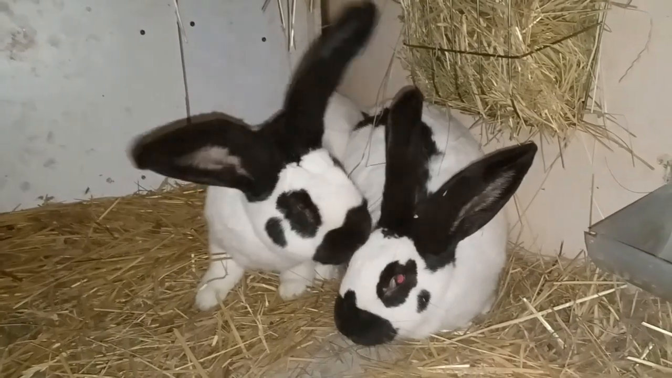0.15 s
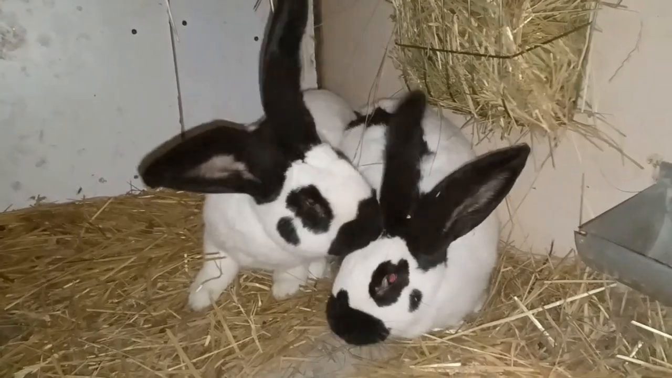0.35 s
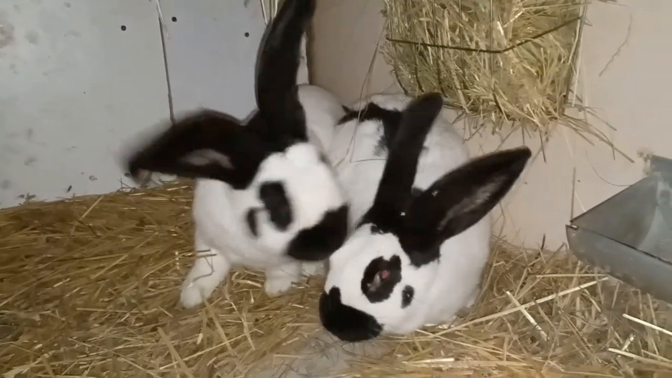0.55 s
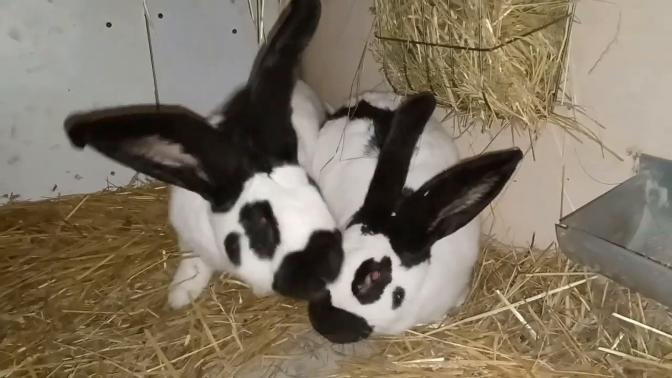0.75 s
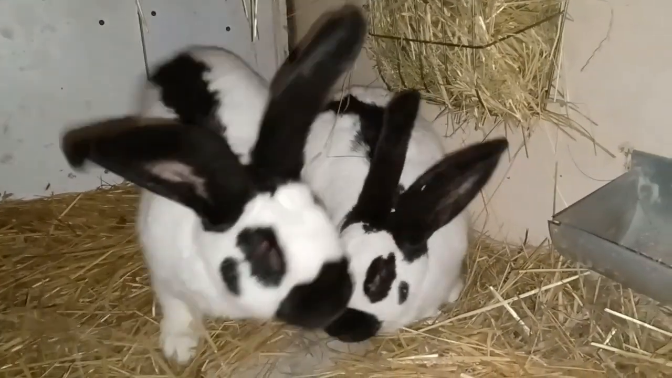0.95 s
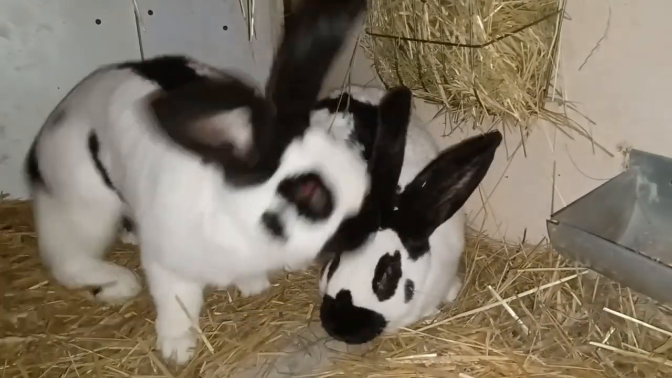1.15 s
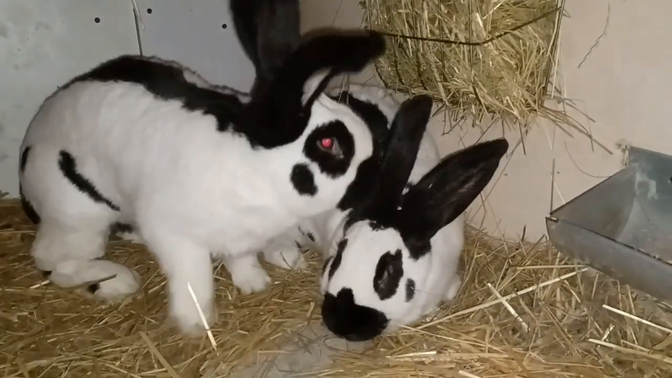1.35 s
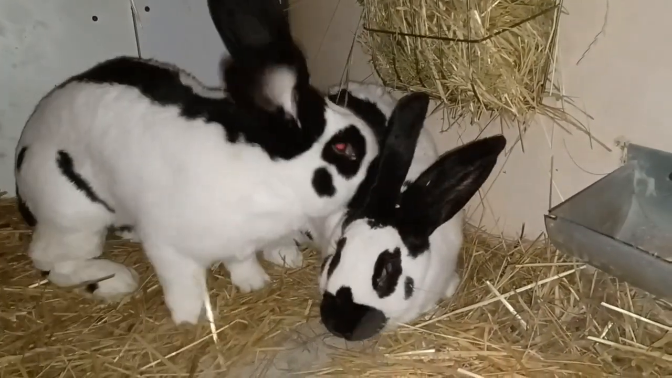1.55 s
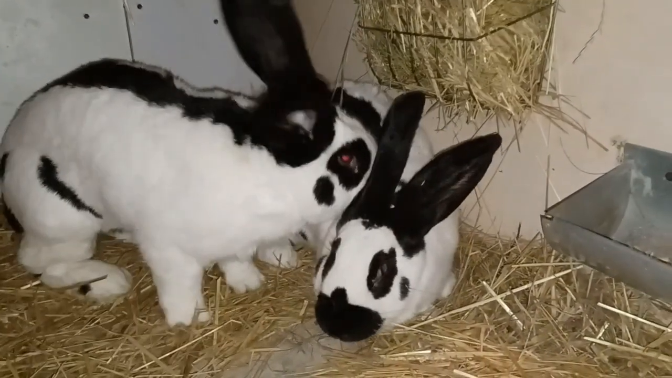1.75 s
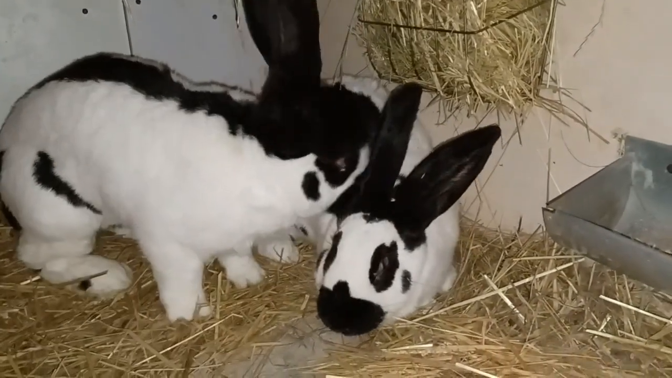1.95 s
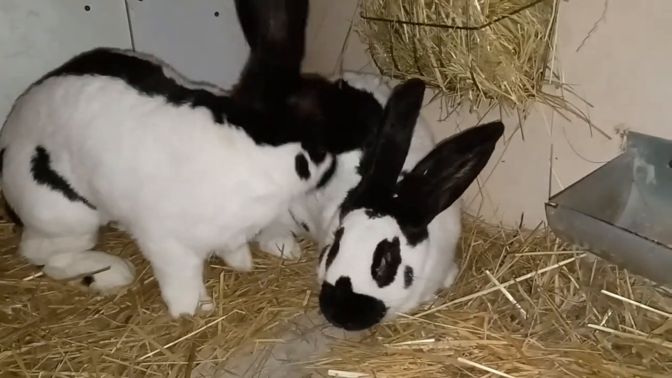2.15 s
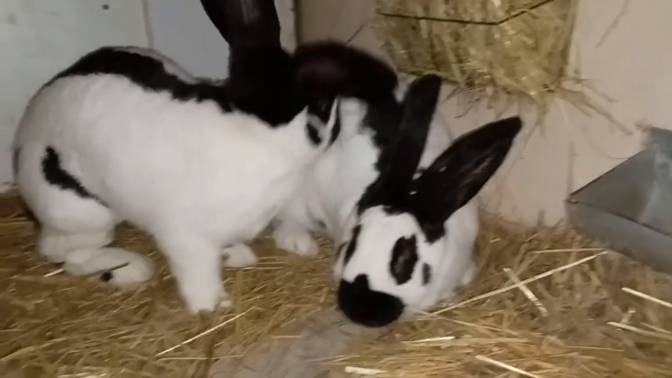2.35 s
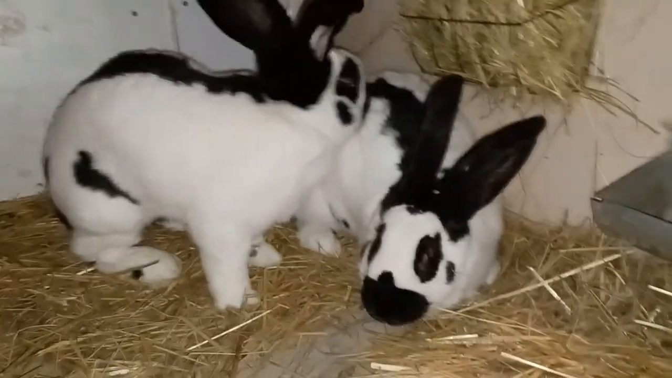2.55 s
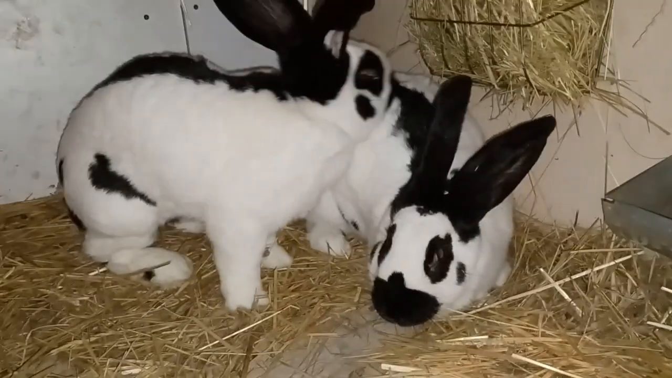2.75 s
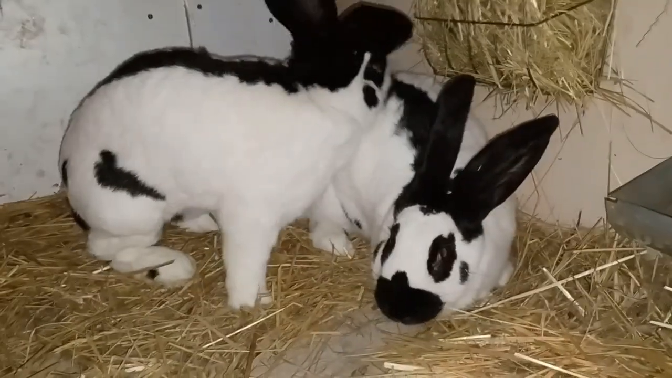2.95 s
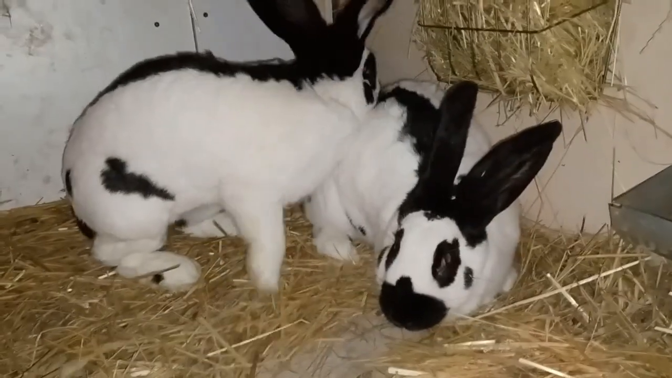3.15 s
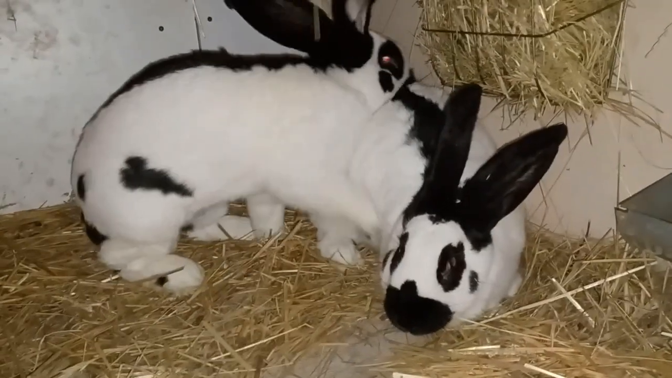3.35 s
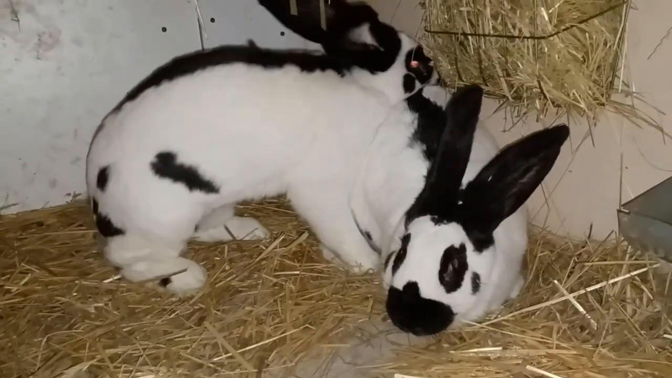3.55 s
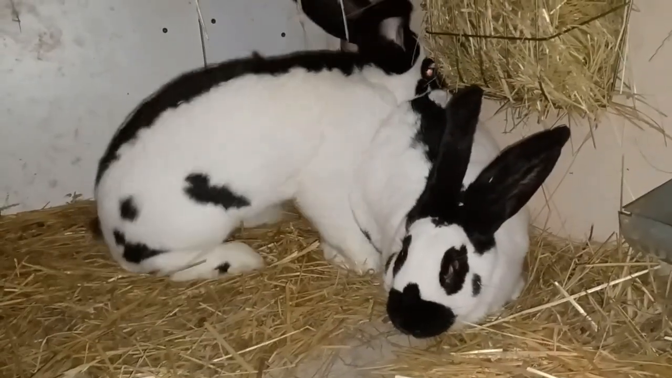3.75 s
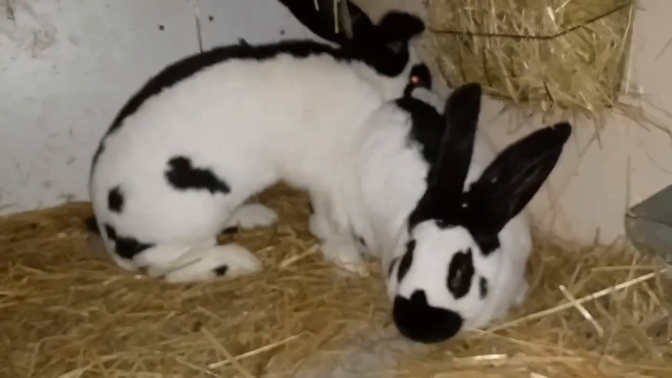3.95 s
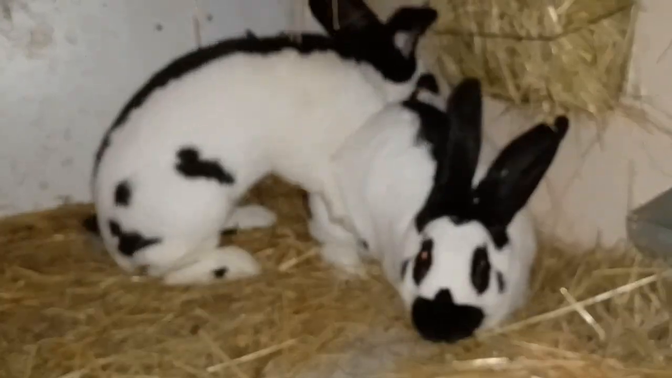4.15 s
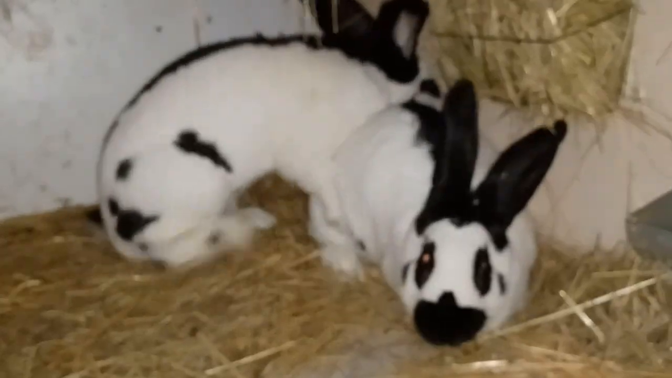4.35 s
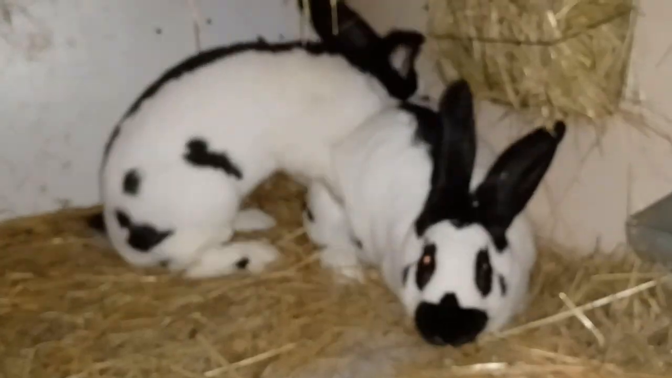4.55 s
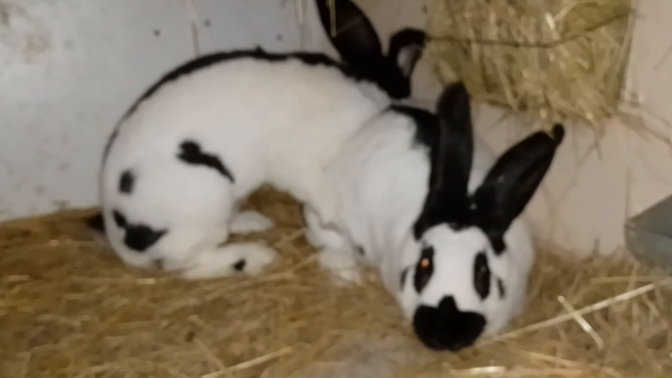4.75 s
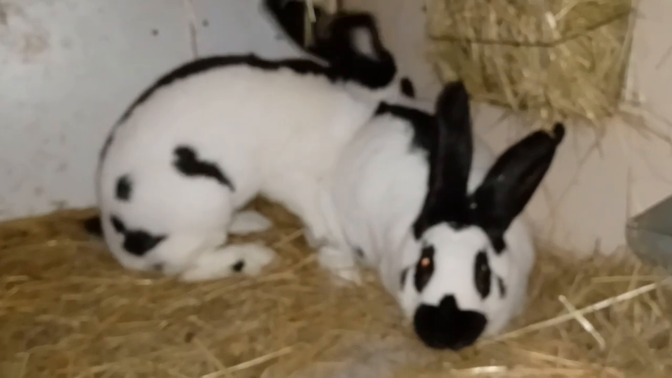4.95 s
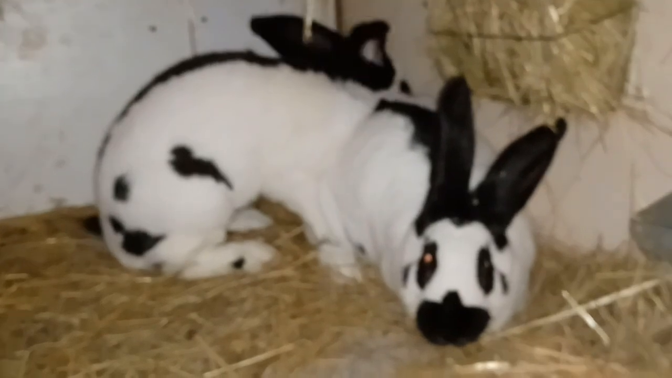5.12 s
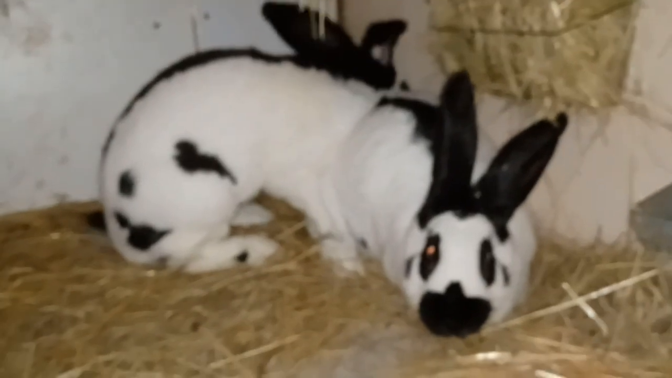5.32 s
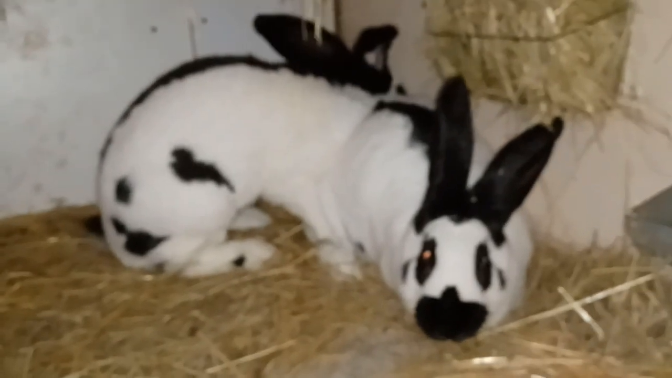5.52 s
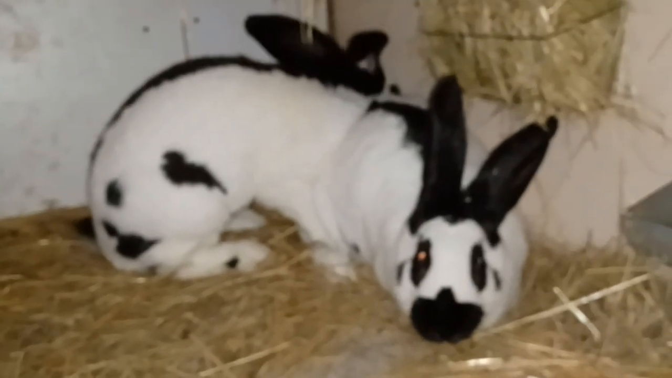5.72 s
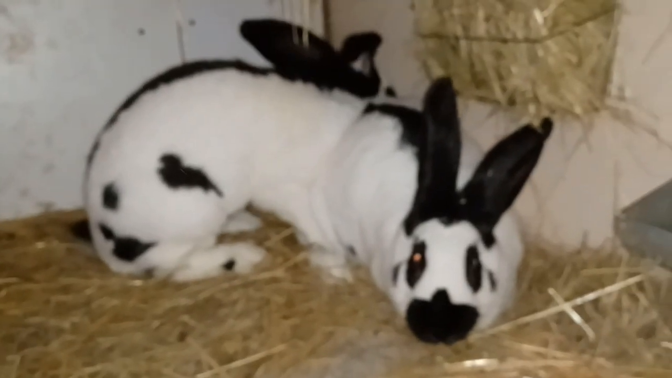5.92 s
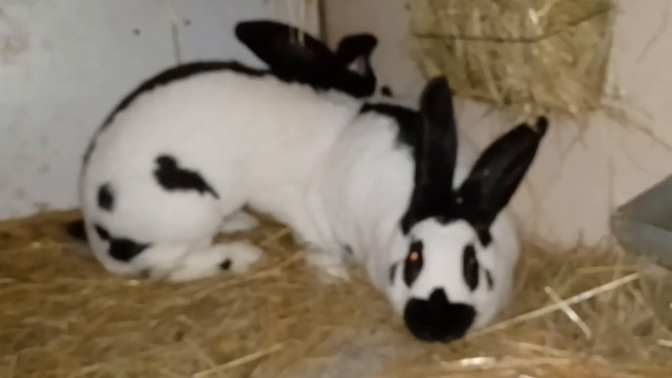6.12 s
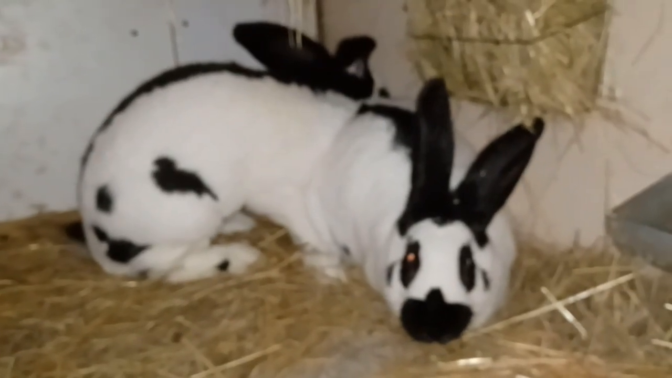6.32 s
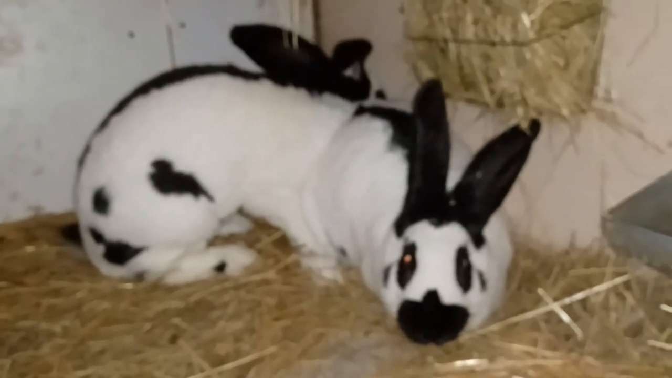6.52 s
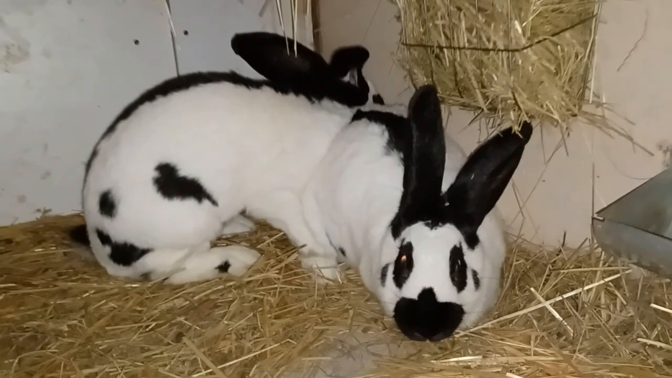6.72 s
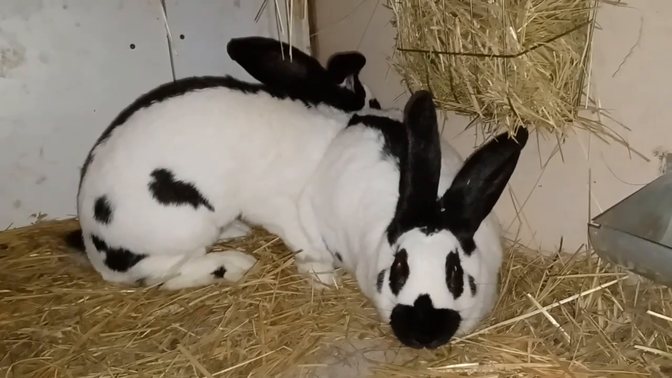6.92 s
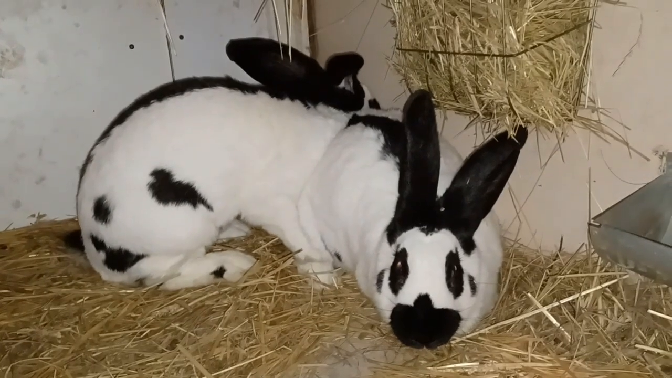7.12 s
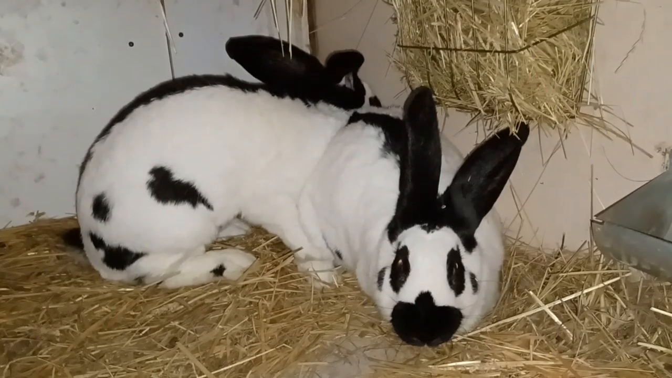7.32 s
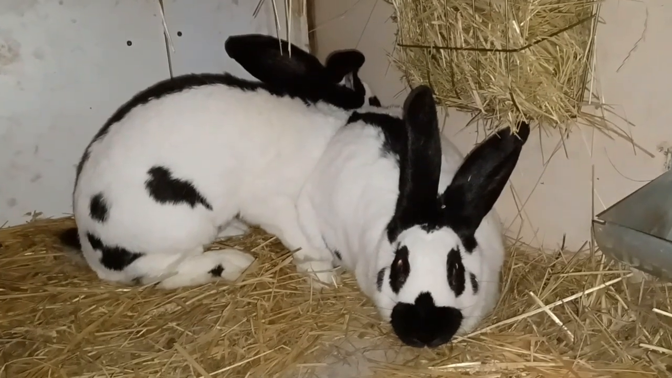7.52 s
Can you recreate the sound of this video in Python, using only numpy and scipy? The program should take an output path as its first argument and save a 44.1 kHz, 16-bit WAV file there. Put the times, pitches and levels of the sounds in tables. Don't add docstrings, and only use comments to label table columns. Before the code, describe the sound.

Rabbits move on deep dry straw, heard very near with hand-held microphones in a small dry enclosure. Quiet at first, then a dull double thump on hollow boards with bright straw crunching, fading into sparse rustles and tiny regular nudges of the bedding. A second thumping rustle follows midway, then a snap, low bumps and creaky dragging. The far drone disappears before the later drags, leaving faint hiss and small crackles.

```python
import sys
import numpy as np
from scipy import signal
from scipy.io import wavfile
from scipy.ndimage import uniform_filter1d

SR = 44100
rng = np.random.default_rng(int(sys.argv[2]) if len(sys.argv) > 2 else 0)


def makeup_ratio(level_db):
    decades = np.asarray(level_db, float) / 20
    return 10 ** decades


def unload_wav(signal):
    wavfile.write(
        sys.argv[1],
        SR,
        np.round(np.clip(np.atleast_2d(signal).T, -1, 1) * 32767).astype(np.int16),
    )


N = 338688
TOP_HZ = 15740

# (time [s], peak [dB], pitch [Hz], t60 [s], rise [s])
PAW_LANDINGS = [(0.8, -37.5, 116, 0.22, 0.005), (0.896, -14.5, 190, 0.059, 0.016),
                (0.9067, -10.5, 109, 0.08, 0.0055), (0.9287, -18.5, 118, 0.094, 0.0054),
                (0.8943, -29, 316, 0.056, 0.0064), (1.124, -25.5, 100, 0.21, 0.0011),
                (1.151, -26.5, 225, 0.11, 0.0029), (3.468, -35.5, 113, 0.25, 0.0042),
                (3.775, -31, 184, 0.023, 0.0015), (3.7842, -16, 94, 0.079, 0.003),
                (1.108, -39, 240, .08, 0.0051), (1.164, -32, 150, .12, 0.0037),
                (3.695, -39.5, 160, 0.092, .004), (3.829, -35, 180, 0.11, .004),
                (0.721, -51.5, 376, 0.071, 0.0026), (3.66, -44.5, 277, 0.12, .005),
                (4.426, -39.5, 241, 0.13, 0.0069), (5.401, -22.5, 88, 0.074, 0.0029),
                (5.431, -26, 75.5, 0.1, 0.004), (5.455, -28.5, 81, 0.27, 0.0028),
                (7.078, -40, 84, 0.35, 0.0037), (7.066, -46, 120, .1, .005), (5.39, -42, 150, .05, .003),
                (4.56, -50, 230, .15, .005)]


def rms_one(x):
    return x / np.sqrt(np.mean(x ** 2) + 1e-20)


def in_time(rows):
    s, *columns = np.transpose(rows)
    return [np.interp(np.arange(N) / SR, s, c) for c in columns]


def at_hz(points, hz):
    points = np.array(points)
    return np.interp(np.log(hz), np.log(points[:, 0]), points[:, 1])


def drift(rate):
    r = np.exp(-80 * np.pi * rate / SR)
    slow = signal.lfilter([1], [1, -2 * r, r * r], rng.standard_normal(N // 40 + 2002))[2000:]
    return np.interp(np.arange(N) / 40, np.arange(len(slow)), rms_one(slow))


def panned(db):
    return makeup_ratio(np.array([db / 2, -db / 2]))


def noise():
    return rng.standard_normal((2, 2, N))


def coloured(white, spectra, patchy_db, ports=1.0):
    # (frequency [Hz], left-right likeness [-1..1])
    likeness = [(60, 0.87), (180, 0.83), (550, 0.23), (1650, -0.22), (4970, 0.0047), (15000, -0.021)]
    # (frequency [Hz], left-right difference [dB])
    port_tilt = [(60, 12), (110, -5.5), (200, 2.5), (380, -8.5), (700, -2.5), (1290, -5.5), (2380, -16),
                 (4400, -13.5), (8120, 1), (15000, -5.5)]
    spectra = [[p for p in s if p[1] > -60 and p[0] < TOP_HZ] for s in spectra]
    low_hz = min(s[0][0] for s in spectra)
    high_hz = 1.2 * max(s[-1][0] for s in spectra)
    edges = np.geomspace(low_hz, high_hz, int(2.6 * np.log2(high_hz / low_hz)) + 1)
    outs = [0] * len(spectra)
    for k, (low, high) in enumerate(zip(edges, edges[1:])):
        band = signal.butter(2, [low, high], "band", fs=SR, output="sos")
        mid, side = signal.sosfilt(band, white[k % 2])
        hz = np.sqrt(low * high)
        alike = np.clip(at_hz(likeness, hz), -1, 1)
        pair = np.sqrt(1 + alike) * mid + np.sqrt(1 - alike) * side * [[1], [-1]]
        pair = pair * panned(ports * at_hz(port_tilt, hz))[:, None] * makeup_ratio(patchy_db * drift(14.1))
        outs = [out + makeup_ratio(at_hz(s, hz)) * pair for out, s in zip(outs, spectra)]
    return [out / np.sqrt(np.mean(out.mean(axis=0) ** 2)) for out in outs]


def resonate(x, hz, width):
    r = np.exp(-np.pi * width / SR)
    return signal.lfilter(np.array([1, 0, -1]) * (1 - r * r) / 2, [1, -2 * r * np.cos(2 * np.pi * hz / SR), r * r], x)


def swell(at_s, rise_s, t60, hold_s=0):
    t = np.arange(min(int((t60 + hold_s) * SR), N - int(at_s * SR))) / SR
    shape = (1 - np.exp(-(t / max(rise_s, 1e-4)) ** 2)) * makeup_ratio(-60 * np.maximum(t - hold_s, 0) / t60)
    return int(at_s * SR), t, shape / shape.max()


def pushes(rows, fine_part=False):
    power = np.zeros(N)
    for s, db, rise, t60, hold, fineness in rows:
        at, t, shape = swell(s, rise, t60, max(hold, 0))
        part = np.clip(fineness, 0, 1) if fine_part else 1
        power[at:at + len(t)] += (makeup_ratio(db) * shape) ** 2 * part
    return power


def slides(rows):
    build_up_db = 21
    t = np.arange(0, N, 20) / SR
    power = 0
    for s, build, hold, db, t60 in rows:
        growth_db = build_up_db * np.minimum(t - s, 0) / build
        release_db = -60 * np.maximum(t - s - hold, 0) / t60
        power = power + makeup_ratio(db + growth_db + release_db) ** 2
    return np.interp(np.arange(N) / SR, t, power)


def drags():
    # (time [s], level [dB], fineness [0 coarse - 1 thin], creak of packed straw [dB])
    drag_curves = [
        [(5.34, -75, 0.2, -98), (5.40, -59, 0.1, -68), (5.47, -48, 0.02, -65.5), (5.60, -46.5, 0.3, -57.5),
         (5.69, -45.5, 0.46, -51), (5.745, -51.5, 0.15, -64.5), (5.775, -61.5, 0.45, -69),
         (5.98, -68.5, 0.5, -100), (6.15, -85, 0.2, -97)],
        [(6.42, -72.5, 0.84, -81), (6.6, -58, 0.56, -81), (6.66, -50, 0.48, -70.5), (6.79, -49.5, 0.3, -70.5),
         (6.84, -53.5, 0.4, -68), (7.0, -50, 0.25, -60), (7.18, -54.5, 0.4, -60.5), (7.197, -59.5, 0.56, -73),
         (7.32, -75, 0.5, -88)],
    ]
    rows = []
    for part in drag_curves:
        before = (part[0][0] - .01, -120, .5, -120)
        after = (part[-1][0] + .01, -120, .5, -120)
        rows += [before, *part, after]
    return in_time(rows)


def still_air():
    # (frequency [Hz], density [dB per Hz])
    hiss_spectrum = [(180, -8), (300, -19), (601, -3), (1000, -1), (1980, -10), (2620, -9.5), (3410, -17),
                     (5510, -13), (8050, -14.5), (15600, -17.5)]
    hiss, = coloured(noise(), [hiss_spectrum], patchy_db=2.5, ports=0.18)
    return makeup_ratio(-76) * hiss


def drone():
    # (time [s], level [dB], change of its first strand, at 840 Hz [dB])
    drone_curve = [(0, -56.5, 0), (.6, -56.5, 1.5), (1.2, -55, 0.5), (1.5, -54, -6.5), (1.9, -61, -7),
                   (2.4, -66.5, -3), (3.0, -66, -7), (3.4, -80, -10), (4.6, -70, -1), (5.4, -110, -4)]
    # (pitch [Hz], width [Hz], level [dB])
    strands = [(840, 58, 0), (945, 75, -1), (1040, 120, -10), (720, 130, -10)]
    # (time [s], pitch shift [ratio])
    pitch_slide = [(0, 1.0), (1.1, 1.0), (1.9, 1.055), (7.68, 1.055)]
    level_db, first_strand_db = in_time(drone_curve)
    shift, = in_time(pitch_slide)
    shared, left, right = rng.standard_normal((3, N + N // 8))
    white = 0.8 * shared + np.array([left, right])
    read = np.cumsum(shift)
    out = 0
    for k, (hz, width, db) in enumerate(strands):
        strand = rms_one(resonate(resonate(white, hz, width), hz, width))
        slid = np.array([np.interp(read, np.arange(len(shared)), side) for side in strand])
        out = out + makeup_ratio(db + first_strand_db * (k == 0) + 1.8 * drift(16.0)) * slid
    return makeup_ratio(level_db - 5.0 + 0.43 * drift(11.0)) * out


def hutch(sliding):
    # (time [s], rumble level [dB])
    weight = [(0.0, -58), (0.41, -64.5), (0.77, -54.5), (0.96, -48), (1.05, -46), (1.56, -59),
              (1.88, -62.5), (2.33, -58), (2.74, -63.5), (3.72, -52), (3.98, -60), (5.31, -59.5),
              (5.54, -54.5), (5.7, -54.5), (5.76, -64.5), (5.97, -62.5), (6.63, -69.5), (6.91, -62.5),
              (7.68, -72)]
    # (frequency [Hz], density [dB per Hz])
    rumble_spectrum = [(90, -15), (130, -4), (180, -1), (240, -4), (320, -23), (420, -32), (600, -67.5)]
    depth_spectrum = [(25, -21), (45, -14), (60, 2), (90, -5), (125, 2), (170, -21.5)]
    creak_spectrum = [(300, 17.5), (500, 9), (800, 12), (1200, 4.5), (1800, -14), (2400, -44)]
    depth_db, deepens_db_per_s, settles_from_s = -11.5, 2, 2.76
    shake_db, shake_t60_s = -26.5, 0.31
    creak_rest_db, creak_settles_db_per_s, creak_follows_weight = -69, 3.5, 0.25
    creak_under_slide_db, creak_lag_s = -17, 0.025

    weight_db, = in_time(weight)
    t = np.maximum(np.arange(N) / SR - settles_from_s, 0)
    after_thumps = pushes([(s, db + shake_db, .02, shake_t60_s, 0, 0) for s, db, *_ in PAW_LANDINGS])
    shake = np.sqrt(makeup_ratio(weight_db) ** 2 + after_thumps)

    lag = np.exp(-1 / (creak_lag_s * SR))
    slid_on = signal.lfilter([1 - lag], [1, -lag], sliding)
    rest_db = creak_rest_db - creak_settles_db_per_s * t + creak_follows_weight * (weight_db - weight_db.mean())
    pressed = np.sqrt(makeup_ratio(rest_db) ** 2 + makeup_ratio(drags()[2]) ** 2 + makeup_ratio(creak_under_slide_db) ** 2 * slid_on)

    rumble, depth = coloured(noise(), [rumble_spectrum, depth_spectrum], patchy_db=3.5, ports=0.34)
    creak, = coloured(noise(), [creak_spectrum], patchy_db=3.5, ports=0.6)
    deepening = makeup_ratio(depth_db + deepens_db_per_s * t + 2 * drift(6.0))
    return shake * (rumble + deepening * depth) + pressed * creak


def thumps():
    # (time [s], peak [dB], pitch [Hz])
    weight_shifts = [(.03, -73, 108), (0.119, -52, 82), (0.52, -48, 84), (6.599, -53.5, 77),
                     (.415, -46, 103), (0.678, -50.5, 187), (1.79, -49, 207.5), (1.799, -48.5, 87),
                     (2.339, -54, 287), (3.076, -50.5, 265), (3.089, -46, 97), (3.339, -42, 80.5),
                     (3.668, -37.5, 82), (3.83, -32.5, 73), (4.842, -42.5, 87), (5.039, -48, 75),
                     (5.262, -41, 69.6), (5.642, -55, 312), (5.639, -38.5, 68), (5.88, -51, 74.5),
                     (6.147, -45, 90.5), (6.856, -44.5, 81), (7.301, -74, 69.5)]
    shift_t60_s, shift_rise_s = 0.25, 0.0028
    out = np.zeros(N)
    for s, peak_db, hz, t60, rise in PAW_LANDINGS + [(*row, shift_t60_s, shift_rise_s) for row in weight_shifts]:
        at, t, shape = swell(s, rise, t60)
        turns = hz * (0.908 * t + 0.0022 * (1 - np.exp(-t / 0.057)))
        swing = np.sin(2 * np.pi * turns)
        swing = swing + 0.089 * np.sin(2 * np.pi * 1.874 * turns)
        damping = np.exp(-(t / (0.37 * t60)) ** 4)
        out[at:at + len(t)] += makeup_ratio(peak_db) * shape * damping * swing
    thinned = signal.sosfiltfilt(signal.butter(2, 62, "high", fs=SR, output="sos"), out)
    return thinned * panned(1.7)[:, None]


def squeaks():
    # (start [s], end [s], first pitch [Hz], last pitch [Hz], level [dB])
    squeak_list = [
        (1.722, 1.745, 3000, 3000, -74),
        (5.338, 5.379, 1700, 1700, -69.5),
    ]
    out, waver = np.zeros(N), makeup_ratio(3.5 * drift(90))
    for start, end, first_hz, last_hz, db in squeak_list:
        a, b = int(start * SR), int(end * SR)
        tone = np.sin(2 * np.pi * np.cumsum(np.linspace(first_hz, last_hz, b - a)) / SR)
        out[a:b] += makeup_ratio(db) * signal.windows.tukey(b - a, .5) * tone
    return waver * out * panned(-18.0)[:, None]


def rubs():
    # (start [s], end [s], pitch [Hz], width [Hz], level [dB])
    rub_list = [(0.09, .15, 5540, 1200, -78), (0.587, 0.645, 5500, 203, -83),
                (1.99, 2.17, 2600, 450, -74.5), (2.42, 2.66, 2630, 700, -81.5),
                (2.797, 2.877, 2640, 200, -74.5), (3.083, 3.095, 2840, 200, -62),
                (3.2, 3.23, 2200, 900, -67), (4.034, 4.377, 2440, 900, -75.5),
                (3.937, 4.85, 1330, 1300, -73), (5.345, 5.382, 2800, 200, -78),
                (3.3, 3.347, 2900, 500, -75), (5.84, 6.096, 2450, 800, -74), (5.998, 6.035, 2570, 400, -78),
                (2.92, 3.043, 974, 120, -72), (6.63, 6.74, 3000, 300, -64), (6.75, 6.95, 2500, 300, -68)]
    out, white = np.zeros((2, N)), rng.standard_normal((2, N)) * makeup_ratio(0.72 * drift(42))
    for start, end, hz, width, db in rub_list:
        a, b = int(start * SR), int(end * SR)
        tone = rms_one(resonate(resonate(white[:, a:b], hz, width), hz, width))
        out[:, a:b] += makeup_ratio(db) * signal.windows.tukey(b - a, .85) * tone
    return out * panned(-13.5)[:, None]


def ticks():
    # (time [s], peak [dB], pitch [Hz], t60 [s], overtone level [dB])
    knocks = [(.121, -55, 900, 0.034, -11), (.472, -60, 900, .03, -12), (0.841, -55, 2630, 0.011, -8),
              (0.861, -44, 3370, .012, -6), (.8926, -32, 3580, .015, -9), (.943, -45, 2430, .012, -4),
              (1.0153, -43, 5450, .012, -20), (1.1067, -42, 3600, .012, -6), (1.1445, -36, 3060, 0.013, -6),
              (1.894, -66, 1010, .02, -8), (3.6268, -40.5, 5060, 0.011, -20), (3.6477, -31, 5070, .02, -20),
              (3.672, -38, 2900, 0.014, -3), (3.7805, -38, 2500, 0.014, -5),
              (3.8313, -48, 2700, 0.0097, -3), (3.852, -45.5, 3000, .01, -8),
              (5.4622, -29.5, 1460, 0.0047, 2), (5.594, -39, 2480, 0.013, -12), (5.596, -44, 750, .03, -7),
              (5.639, -38, 410, 0.017, 1), (5.664, -40, 760, .04, -10), (5.7, -47, 483, .03, -6),
              (5.714, -47, 398, 0.029, -6), (6.0548, -60, 2200, .007, -15),
              (6.0644, -49, 2150, 0.0056, -22), (6.674, -42, 3220, 0.0054, -12),
              (6.7534, -31, 2400, 0.0048, -3.5), (6.779, -43, 2950, .015, -8),
              (7.1002, -39, 2140, .02, -12), (7.0994, -41, 4700, .005, -20), (7.1004, -46, 1100, .01, -12),
              (5.4614, -36, 5200, .006, -20), (.899, -32, 3800, .015, -8), (.108, -66, 2650, .06, -20)]
    overtone_ratio, overtone_t60_share, pan_db = 1.85, .6, -7
    out = np.zeros((2, N))
    for s, peak_db, hz, t60, overtone_db in knocks:
        at, t, shape = swell(s, .0003, t60)
        upper = shape ** (1 / overtone_t60_share) * np.sin(2 * np.pi * overtone_ratio * hz * t)
        lead = np.array([[0], [hz / 2500]])
        ring = shape * np.sin(2 * np.pi * hz * t + lead) + makeup_ratio(overtone_db) * upper
        sides = panned(pan_db * min(hz / 2000, 1))[:, None]
        out[:, at:at + len(t)] += makeup_ratio(peak_db) * sides * ring
    return out


def snaps():
    # (time [s], peak [dB], ring [Hz], left-right difference [dB], length [s])
    breaks = [(0.891, -38, 750, 0, .014), (3.022, -57, 6300, 0, .004), (5.4262, -45, 1400, -5, .003),
              (5.461, -29, 2900, -7, .0018), (7.3258, -58, 2600, -13, .002), (3.139, -47, 4500, -5, .003),
              (4.332, -51, 4000, -5, .003), (7.0994, -38, 3300, -8, .0015), (6.6737, -38, 4200, -8, .0015),
              (1.4715, -47, 4500, -4, .003), (1.6685, -55, 4500, -4, .003), (3.4865, -49, 5000, -4, .003),
              (3.4655, -51, 5500, -4, .003), (7.638, -66, 4000, -4, .003), (5.3365, -62, 3000, -8, .003)]
    stem_t60_s, splinter_share, spread = .005, 1.6, 2.7
    extra_pitch, settle_share = 1.7, .3
    heard = signal.butter(5, [450, 6800], "band", fs=SR, output="sos")
    out = np.zeros((2, N))
    for s, peak_db, hz, pan_db, length in breaks:
        at, t, shape = swell(s, 0.00021, stem_t60_s, length)
        settle = settle_share * min(length, .003)
        bent_t = t + extra_pitch * settle * (1 - np.exp(-t / settle))
        wave = np.sin(2 * np.pi * hz * bent_t + rng.uniform(0, 1.5, (2, 1)))
        splinter = (rng.standard_normal(1200) + .6 * rng.standard_normal((2, 1200)))[:, :len(t)]
        band = signal.butter(1, [hz / spread, min(hz * spread, 9000)], "band", fs=SR, output="sos")
        splinter = rms_one(signal.sosfilt(band, splinter))
        snap = panned(pan_db)[:, None] * shape * (wave + splinter_share * splinter)
        snap = signal.sosfilt(heard, snap)
        out[:, at:at + len(t)] += makeup_ratio(peak_db) * snap / np.abs(snap.mean(axis=0)).max()
    return out


def cracks():
    cracks_per_s, ring_cycles = 900, 14
    sizes = makeup_ratio(3.0 * np.minimum(rng.exponential(1, N), 3)) * (rng.random(N) < cracks_per_s / SR)
    dealt, sides = rng.integers(0, 10, N), rng.standard_normal((2, N))
    out = 0
    for k, hz in enumerate(np.geomspace(2600, 7000, 10)):
        clicks = sides * sizes * (dealt == k) + 1e-18
        out = out + resonate(clicks, hz, 2.0 * hz / ring_cycles) / np.sqrt(hz)
    return rms_one(out)


def stem_ticks(per_s, spread_db):
    sizes = makeup_ratio(spread_db * np.minimum(rng.exponential(1, N), 5)) * (rng.random(N) < per_s / SR)
    return noise() * rms_one(uniform_filter1d(sizes, size=6))


def straw(sliding):
    # (time [s], peak [dB], t60 [s], rise [s], fineness [0 coarse - 1 thin])
    gives = [(0.775, -43, 0.12, .001, 1), (0.836, -28.5, 0.17, 0.01, 1), (0.887, -12, 0.061, .005, 0.89),
             (1.018, -27.5, 0.068, 0.0054, 1), (1.072, -35, 0.14, .001, .95),
             (1.144, -17, 0.061, 0.002, 0.82), (1.3, -36, 0.087, 0.0026, 1), (1.394, -44, 0.044, .001, 1),
             (1.555, -46, .02, .001, .7), (1.469, -30, 0.081, .001, 1), (1.481, -29, .03, .001, 0.88),
             (1.668, -36, 0.014, 0.00073, 0.82), (1.681, -40, 0.03, 0.00055, 0.81),
             (2.05, -50, 0.024, .001, .5), (2.082, -47, .03, .002, .5), (2.314, -39.5, 0.08, 0.0027, 0.97),
             (2.36, -42, 0.029, .002, 0.97), (2.5044, -47, 0.064, .002, .8),
             (2.743, -44.5, .024, 0.00097, 0.76), (2.6, -56, .018, 0.00092, 0.77),
             (2.946, -45, .059, .001, .85), (3.0209, -48, 0.035, .0006, 0.94),
             (3.122, -40, .03, .001, 0.89), (3.138, -35, 0.22, .0005, 0.91), (3.246, -41, .03, .001, 0.64),
             (3.264, -34, 0.048, 0.00092, 0.91), (3.464, -34.5, 0.037, .0004, 0.92),
             (3.486, -35.5, .037, .0004, 1), (3.516, -29, .028, 0.00048, 0.96),
             (3.626, -30, 0.045, .002, 1), (3.67, -24, 0.035, .002, 0.81), (3.761, -30, .068, .006, 1),
             (3.775, -28, 0.037, .002, 0.92), (3.8315, -29, 0.079, .002, 0.57),
             (3.85, -30, 0.02, .001, 0.56), (4.3315, -44, 0.023, .0004, 0.62),
             (4.389, -32, 0.15, 0.00089, 0.69), (4.575, -44, 0.04, .002, 0.91),
             (1.108, -24, 0.036, .002, 0.83), (6.929, -38, 0.045, .001, .5)]
    # (time [s], peak [dB], fineness [0 coarse - 1 thin], rise [s])
    flank_nudges = [(0.0857, -55.5, .22, 0.02), (0.5851, -55.5, 0.26, 0.019), (0.705, -51, 1, 0.032),
                    (2.042, -41.5, 0.6, 0.011), (2.2777, -46, 0.86, 0.0083), (2.4703, -46, 0.65, .008),
                    (2.66, -48.5, 0.65, 0.0066), (2.8595, -42, 0.77, .01), (3.068, -39, 0.94, 0.016),
                    (4.123, -46, 0.28, .006), (4.741, -47, 0.35, 0.009), (4.946, -50, 0.36, .008),
                    (5.136, -49.5, 0.51, 0.022), (5.334, -49, 0.32, .005), (5.7994, -52, .98, .01),
                    (6.001, -45.5, 0.13, 0.0089), (6.219, -49, 0.53, 0.016), (6.4218, -52.5, 0.27, .014),
                    (7.239, -52, 0.44, .01), (7.3253, -50, 0.14, .006), (7.434, -49.5, 0.31, 0.014),
                    (7.639, -48, 0.65, .005)]
    # (full at [s], build-up [s], hold [s], level [dB], release t60 [s])
    fur_brushes = [(.845, 0.055, 0.013, -50, 0.076), (.888, 0.0069, 0.0059, -47, 0.017),
                   (1.026, .04, .006, -54, 0.25), (1.073, .004, 0.031, -47, 0.28),
                   (1.146, .004, 0.005, -38, 0.04), (1.41, .03, .04, -62, .1), (3.14, .002, .015, -56, .06),
                   (3.7, .03, .012, -56, .06), (3.756, .003, 0.017, -61, 0.083),
                   (3.842, .004, .004, -52, 0.037), (3.2, 0.092, 0.091, -71, 0.099),
                   (7.05, 0.22, 0.12, -57, .1)]
    # (frequency [Hz], density [dB per Hz])
    fine_spectrum = [(710, -34.5), (1200, -6), (1500, -28), (2050, -28.5), (2680, 1), (3220, -0.5),
                     (5060, 4), (7850, -3), (12700, 4.5), (15600, 7)]
    coarse_spectrum = [(710, -12), (1200, -4), (1660, -0.5), (2520, -2.5), (3260, -9), (6000, -2),
                       (7770, -14), (12200, -9.5), (15600, -16.5)]
    fur_spectrum = [(7000, -24), (9000, -18), (11500, 1), (13500, 7), (15600, 4)]
    give_crest_db, give_hold_share = 16.0, 0.17
    nudge_hold_s, nudge_t60_s, nudge_crest_db, nudge_uneven_db = 0.019, 0.4, 15.5, 1.6
    slide_fineness, slide_pan_db, drag_pan_db, crackle_db, cracks_db = 0.78, 5, 3, -1, -11

    drag_db, drag_fineness, _ = drags()
    puffs = [(s, db - give_crest_db, rise, t60, give_hold_share * t60, f) for s, db, t60, rise, f in gives]
    nudges = [(s - rise, db - nudge_crest_db, rise, nudge_t60_s, nudge_hold_s, f)
              for s, db, f, rise in flank_nudges]
    uneven = makeup_ratio(nudge_uneven_db * drift(22)) ** 2
    drag = makeup_ratio(drag_db) ** 2
    power = sliding + pushes(puffs) + uneven * pushes(nudges) + drag
    fine_power = slide_fineness * sliding + pushes(puffs, True) + uneven * pushes(nudges, True)
    share = np.clip((fine_power + drag_fineness * drag) / power, 0, 1)
    pan_db = slide_pan_db + (drag_pan_db - slide_pan_db) * drag / power

    friction = 0.97 * noise() + 0.44 * stem_ticks(2500, spread_db=2.5)
    fine, coarse, fur = coloured(friction, [fine_spectrum, coarse_spectrum, fur_spectrum], patchy_db=1.5)
    stems = share * fine + (1 - share) * coarse
    stems = stems + makeup_ratio(cracks_db) * panned(-9.0)[:, None] * cracks()
    bed = np.sqrt(power) * stems + np.sqrt(slides(fur_brushes)) * fur
    return makeup_ratio(crackle_db * drift(61)) * panned(pan_db) * bed


def scene():
    # (full at [s], build-up [s], hold [s], level [dB], release t60 [s])
    stem_slides = [(0.786, 0.05, .05, -64.5, .3), (0.889, 0.084, 0.012, -40, 0.25),
                   (0.937, .03, 0.11, -53, 0.34), (1.08, 0.044, 0.055, -45.5, 0.18),
                   (1.143, 0.1, 0.015, -39, 0.29), (1.28, 0.039, 0.18, -59.5, .3),
                   (1.473, 0.015, 0.012, -48.5, 0.31), (1.62, 0.11, 0.11, -69.5, 0.75),
                   (2.19, 0.79, 0.82, -71.5, .6), (2.064, 0.12, 0.022, -64, 0.19),
                   (2.311, 0.076, 0.059, -58, 0.11), (2.877, 0.08, 0.087, -65, .3),
                   (3.082, 0.05, 0.16, -57, .12), (3.251, .04, 0.07, -57.5, 0.32),
                   (3.485, 0.038, 0.038, -55.5, 0.43), (3.65, 0.052, 0.02, -36.5, 0.25),
                   (3.768, 0.03, 0.018, -44, 0.6), (4.044, 0.066, 0.35, -69.5, .5),
                   (4.349, 0.046, 0.11, -47.5, 0.07), (4.514, 0.095, 0.062, -59, 0.25),
                   (4.613, .03, 0.043, -72, 0.96), (3.906, .03, 0.045, -59, 0.1)]
    sliding = slides(stem_slides)
    background = still_air() + drone()
    floor = hutch(sliding) + thumps()
    single_stems = squeaks() + rubs() + ticks() + snaps()
    return background + floor + single_stems + straw(sliding)


def band_limit(x):
    return signal.sosfilt(signal.butter(12, 16430, fs=SR, output="sos"), x)


def record(dry):
    ring = resonate(dry[1], hz=2690, width=370)
    ported = np.array([dry[0], dry[1] + (makeup_ratio(4.6) - 1) * ring])
    mix = signal.sosfilt(signal.butter(4, 47, "high", fs=SR, output="sos"), ported)
    mix = signal.sosfilt(signal.ellip(12, .5, 70, TOP_HZ, fs=SR, output="sos"), mix)
    return band_limit(mix)


dry = scene()
out = record(dry)
unload_wav(out)
```